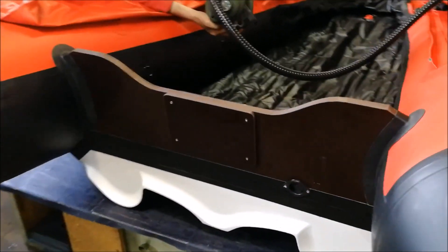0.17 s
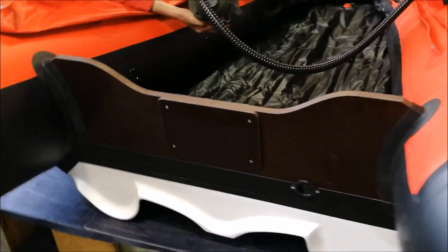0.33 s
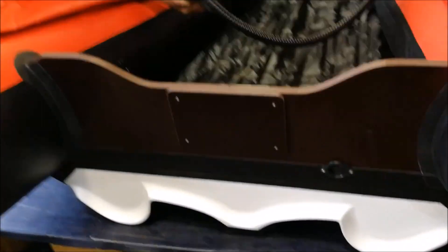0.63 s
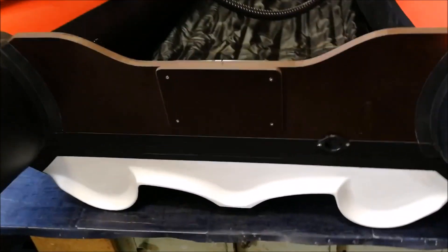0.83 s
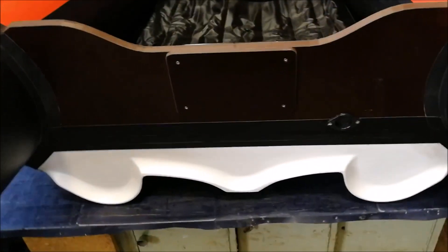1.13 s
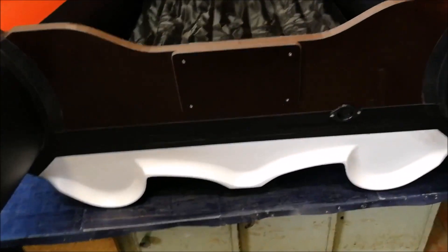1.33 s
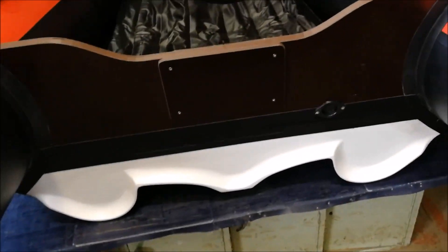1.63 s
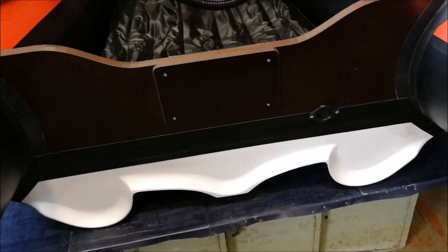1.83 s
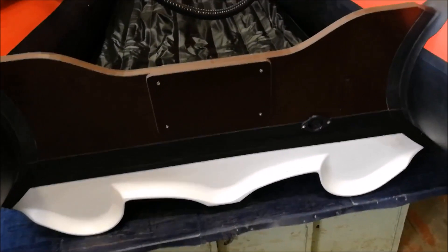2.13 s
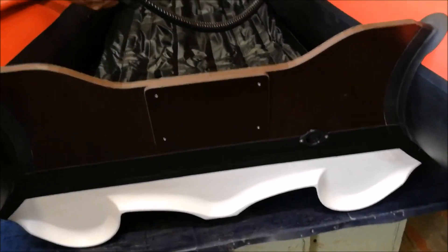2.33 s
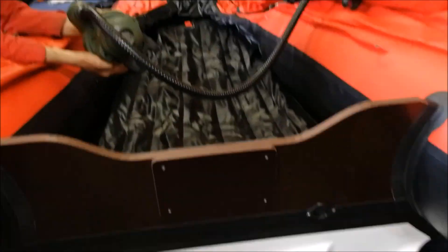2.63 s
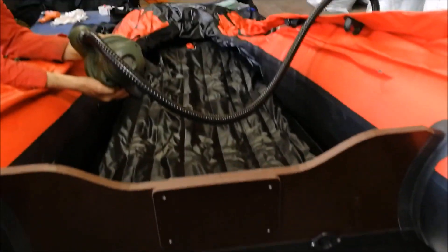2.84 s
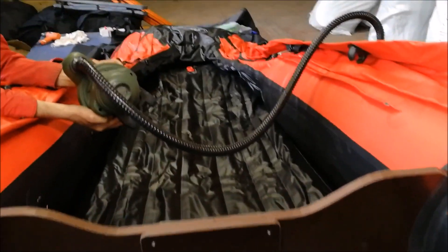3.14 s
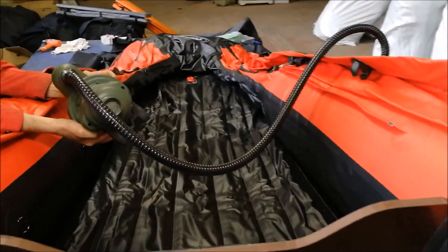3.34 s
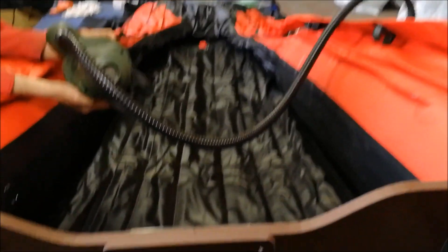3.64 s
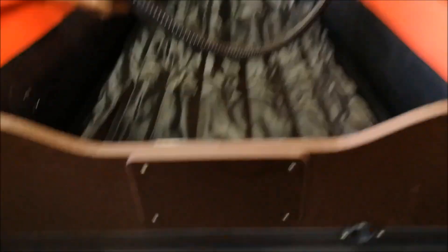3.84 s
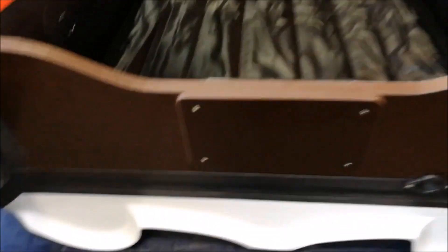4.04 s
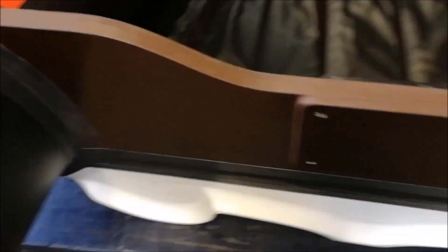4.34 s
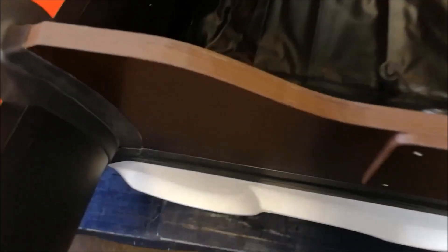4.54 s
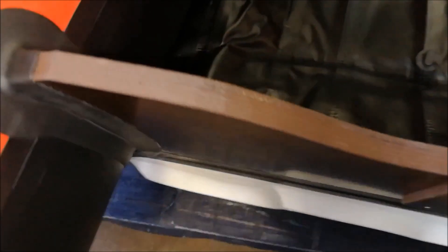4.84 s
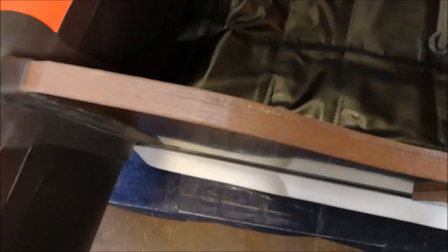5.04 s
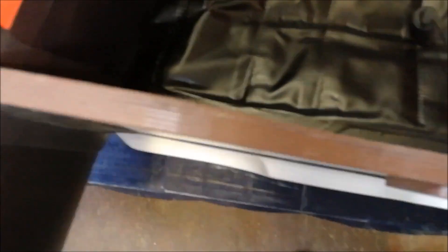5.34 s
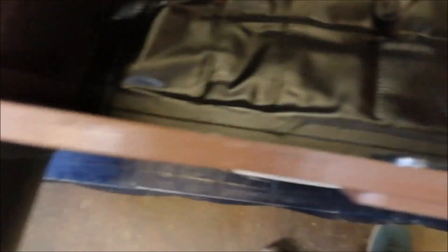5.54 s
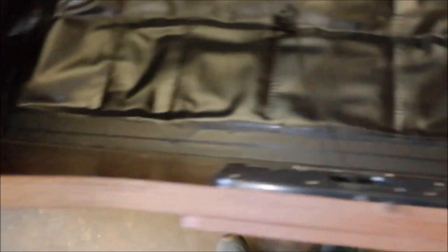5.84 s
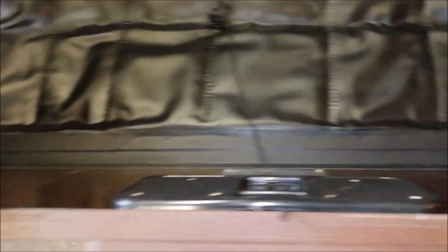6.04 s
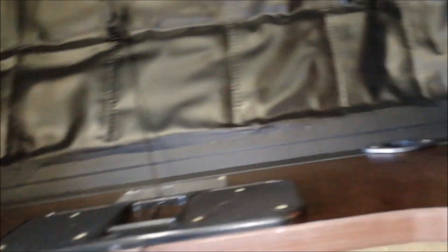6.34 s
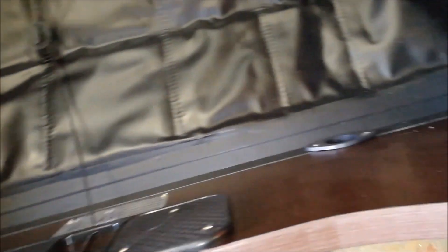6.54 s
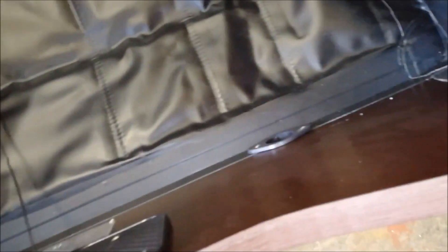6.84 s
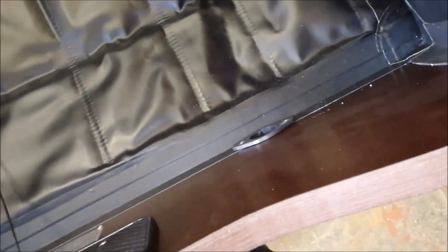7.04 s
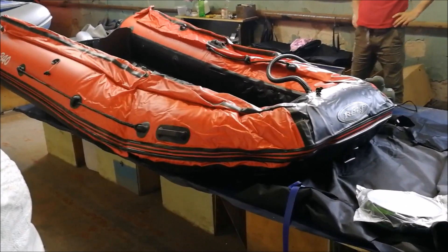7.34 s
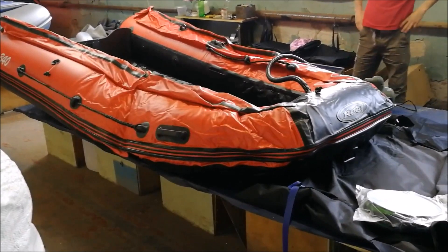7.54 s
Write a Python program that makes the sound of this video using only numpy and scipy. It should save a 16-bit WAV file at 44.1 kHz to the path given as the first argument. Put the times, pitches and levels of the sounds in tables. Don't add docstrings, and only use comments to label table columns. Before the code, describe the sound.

An electric air pump roars and whines close up with buffeting thumps, switches off and winds down, then restarts and runs steadily farther away.

```python
import sys
import numpy as np
from scipy import signal
from scipy.io import wavfile
from scipy.ndimage import uniform_filter1d, map_coordinates

SR = 44100
rng = np.random.default_rng(int(sys.argv[2]) if len(sys.argv) > 2 else 0)


def volts_from_db(level):
    exponent = np.asarray(level, float) / 20
    return 10 ** exponent


def log_audio(samples):
    frames = np.atleast_2d(samples).T
    limited = np.clip(frames, -1, 1)
    pcm = np.round(limited * 32767).astype(np.int16)
    wavfile.write(sys.argv[1], SR, pcm)


N = 338688
T = np.arange(N) / SR
FRAME, HOP = 1024, 256
OFF_S, BREAK_S, RESUME_S = 3.821, 7.128, 7.161


def unit(x):
    return x / np.sqrt(np.mean(x ** 2))


def curves(table, t):
    s, *columns = np.transpose(table)
    return [np.interp(t, s, c) for c in columns]


def colour(table, hz):
    table_hz, value = np.array(table)[:, :2].T
    return np.interp(np.log(np.maximum(hz, 1)), np.log(table_hz), value)


def bump(x, middle, half):
    return np.exp(-np.square(np.square((x - middle) / half)))


def walk(rate_hz):
    knots = rng.standard_normal(200)
    return map_coordinates(knots, [T[::64] * rate_hz], order=3).repeat(64)[:N]


def shaped(db, likeness):
    a, b = (signal.stft(rng.standard_normal(N), nperseg=FRAME, noverlap=FRAME - HOP)[2] for _ in range(2))
    c = np.clip(likeness, -.99, .99)[:, None]
    pair = np.array([a, c * a + np.sqrt(1 - c ** 2) * b]) * volts_from_db(db)
    return signal.istft(pair, nperseg=FRAME, noverlap=FRAME - HOP)[1][:, :N]


# (time [s], speed [turns/s])
LOADED = [(0, 585.6), (1, 587.3), (1.9, 588), (2.4, 588.6), (3.36, 590.1), (3.821, 590.5)]


def shaft(t):
    rest_hz, scale_hz, drag_rate, resumed_hz = 9.84, 192.3, .2331, 560.3
    angle = np.arctan((LOADED[-1][1] - rest_hz) / scale_hz)
    coast = rest_hz + scale_hz * np.tan(angle - drag_rate * np.clip(t - OFF_S, 0, None))
    return np.where(t < OFF_S, curves(LOADED, t)[0], np.where(t < BREAK_S, coast, resumed_hz))


def speed_db(t):
    return 20 * np.log10(shaft(t) / LOADED[-1][1])


# (frequency [Hz], level [dB])
LEFT = [(40, -24), (250, -2), (520, -10.5), (750, 3.5), (1800, 1.5), (3000, 5), (3800, 1), (4500, 1),
        (6800, -1), (7500, 1.5), (8600, 8.5), (9900, 3), (11500, -5.5), (15500, -13)]
RIGHT = [(40, -20), (250, -3), (550, -9.5), (1150, 2), (1500, 2), (2200, 3), (2700, 0.5), (4900, -2.5),
         (6200, -6), (7300, -8.5), (9300, -4.5), (11000, -1.5), (12500, 2), (15500, -7)]
# (frequency [Hz], full-speed level [dB], slope [dB per dB of speed], turning the phone [dB per turn])
ROAR_LAW = [(1340, -35.5, 0.9, 2), (4540, -25.5, 1.43, 1.9), (8650, -21, 1.94, 0.8), (12440, -32, 1.86, 13)]
# (time [s], nearness [dB], turned to outlet [0-1], left minus right [dB])
STANCE = [(0, -2, 0, -2.7), (.6, -0.5, 0, -2.2), (1.3, -1.1, 0.39, -0.2), (2.4, -0.65, 0.09, .1),
          (3.3, -0.8, 0.25, 0.7), (3.75, -0.1, 0.08, -1), (3.86, 1, 0.14, -1), (3.93, -0.1, 0.05, -0.2),
          (4.23, 2.5, 0.74, 2.1), (4.45, 1.4, 0.93, -4.3), (5.0, 1.2, 0.88, -2.3), (5.55, 3.2, 0.3, -2.5),
          (5.95, 3.5, 0, -1.3), (6.5, 1.2, 0.3, 1), (7.12, 2, 0.3, 2.3), (7.16, -5, 0, 2.5),
          (7.68, -5, 0, 2.5)]


def roar_db(t, hz):
    near_db, turn, pan_db = curves(STANCE, t)
    full_db, steep, turn_db = (colour([(row[0], row[k]) for row in ROAR_LAW], hz) for k in (1, 2, 3))
    restart_s = 7.03
    back = 0.76 * np.clip((t - restart_s) / (BREAK_S - restart_s), 0, 1) ** 0.84
    hard_s = [s for s, peak_db, *_ in PUFFS if peak_db > -19]
    duck = sum((t > s) * np.exp(-np.abs(t - s) / 0.15) for s in hard_s)
    duck_db = -2 * np.minimum(duck, 1)
    mid_db = full_db + steep * speed_db(t) * (1 - back) + near_db + turn * turn_db + duck_db
    return np.array([mid_db + colour(LEFT, hz) + pan_db / 2, mid_db + colour(RIGHT, hz) - pan_db / 2])


# (frequency [Hz], correlation [-1 to 1])
LIKENESS = [(40, 0.42), (200, 1), (400, 0.21), (550, -0.28), (800, 0.37), (1200, 0.56), (2200, -0.091),
            (16000, -0.058)]
# (middle [s], half length [s], frequency [Hz], half
# width [Hz], level [dB])
GLINTS = [(4.7, 0.2, 11300, 550, 6.5), (5.17, 0.23, 2200, 150, 9), (5.66, 0.78, 1520, 220, 6.5),
          (3.32, 0.45, 5500, 2100, 2.5), (3.2, 0.23, 1600, 89, 4.5), (5.22, 0.38, 9460, 460, 5.5),
          (4.65, .55, 14700, 980, -7), (0.62, 0.66, 1920, 220, 3.5), (6.6, 2.9, 460, 850, 3),
          (7.115, .02, 3850, 150, 11), (7.115, 0.022, 2200, 81, 9), (7.23, 0.51, 1020, 320, -4),
          (6.4, 0.3, 10800, 600, 1)]
LEFT_GLINTS = [
    (4.73, 0.29, 8870, 470, 4.6),
    (4.74, 0.33, 2730, 600, 6.5),
]


def roar(patch_db=2.0, flicker_db=0.95, gain_db=9.5):
    hz = np.fft.rfftfreq(FRAME, 1 / SR)
    t = np.arange(-(-N // HOP) + 1) * HOP / SR

    def glint_db(rows):
        return sum(db * np.outer(bump(hz, f, half_hz), bump(t, s, half_s)) for s, half_s, f, half_hz, db in rows)

    def smooth(x, bins, frames):
        return unit(uniform_filter1d(uniform_filter1d(x, size=bins, axis=1), size=frames, axis=2))

    chance = rng.standard_normal((2, len(hz), len(t)))
    patches = smooth(chance, 8, 60)
    flicker = smooth(chance[::-1, ::-1], 90, 8)
    db = roar_db(t[None], hz[:, None]) + patch_db * patches + flicker_db * flicker
    db = db + glint_db(GLINTS) + gain_db
    db[0] += glint_db(LEFT_GLINTS)
    return shaped(db, colour(LIKENESS, hz))


def tone(turns, hz, db):
    gain = volts_from_db(np.array([colour(LEFT, hz[::64]), colour(RIGHT, hz[::64])]))
    share = (gain / np.hypot(*gain)).repeat(64, axis=1)[:, :N]
    fade_db = 2.8 * np.array([walk(18), walk(18)])
    phase = turns + uniform_filter1d(.12 * np.array([walk(7), walk(7)]), size=64)
    return volts_from_db(db + fade_db + 5) * share * np.sin(2 * np.pi * phase)


ORDERS = (1, 2, 7, 8, 14, 16, 17, 21, 28, 35, 42, 49, 63)
# (loaded [dB], coasting at full speed [dB], further away [dB])
STEADY = [(-67, -52, -55.5), (-50, -60, -67), (-42.5, -52, -41), (-46.5, -66, -63), (-30.5, -47, -34),
          (-32, -54, -51), (-62, -72, -70), (-53, -36, -60), (-60, -51, -66), (-60, -50, -66),
          (-64, -51, -70), (-64, -50, -70), (-70, -56, -74)]
# (middle [s], half length [s], level [dB])
STREAKS = [
    [(4.48, 0.06, -42.5), (4.8, 0.064, -46.5), (5.15, .25, -51), (6.15, 0.19, -56.5)],
    [(2.3, .5, -57)],
    [(1.35, .45, -37), (3.55, 0.59, -35.5), (6.0, 0.18, -51), (6.38, 0.14, -49)],
    [(2.406, 1.7, -42)],
    [(1.55, 0.69, -29), (2.72, .18, -28), (3.42, 0.058, -30), (4.02, 0.065, -26.5), (4.25, 0.12, -33.5),
     (4.75, .1, -37.5), (5.15, 0.11, -32)],
    [(1.45, 0.42, -34), (2.45, 0.44, -33)],
    [(1.9, .9, -37)],
    [(3.9, .07, -42), (4.17, 0.063, -28), (4.38, 0.075, -22.5), (4.56, 0.07, -35)],
    [(4.15, 0.33, -50), (4.55, 0.11, -38), (5.7, 0.2, -62)],
    [(4.5, 0.098, -43), (4.8, 0.084, -31), (5.05, .08, -46)],
    [(5.05, 0.063, -45), (5.8, .15, -54)],
    [(4.98, .15, -49), (5.5, .17, -47), (5.92, 0.11, -38)],
    [(5.6, .12, -54), (6.08, .08, -55)],
]


def impeller():
    coast_slope = 1.36
    hz, t = shaft(T), T[::64]
    turns = np.cumsum(hz + .1 * walk(15)) / SR
    out = 0
    for k, (load_db, coast_db, far_db), rows in zip(ORDERS, STEADY, STREAKS):
        loaded_db = load_db + curves(STANCE, t)[0]
        coasting_db = coast_db + coast_slope * speed_db(t)
        db = np.where(t < OFF_S, loaded_db, np.where(t < BREAK_S, coasting_db, far_db))
        swell = volts_from_db(db) + sum(volts_from_db(top_db) * bump(t, s, half_s) for s, half_s, top_db in rows)
        audible = k * shaft(t) < 16000
        out = out + np.interp(T, t, swell * audible) * tone(k * turns, k * hz, 0)
    return out


# (start [s], end [s], frequency [Hz], level [dB])
WHIRL = [
    (0, 2.75, 189, -45.5),
    (2.75, 3.85, 188, -53),
    (1.1, 1.95, 248, -50),
    (3.05, 3.5, 246, -49),
    (6.95, 7.13, 265, -48),
    (7.16, 7.7, 377, -55),
    (7.16, 7.7, 247, -55),
]


def whirl():
    out = 0
    for start_s, end_s, hz, db in WHIRL:
        on = np.clip(np.minimum(T - start_s + 0.091, end_s - T) / 0.093, 0, 1)
        level = volts_from_db(db + 3 + 2.2 * walk(10))
        out = out + on * level * np.sin(2 * np.pi * np.cumsum(hz + 1.5 * walk(14)) / SR)
    return out


# (time [s], frequency [Hz], level [dB])
HOSE = [
    (5.18, 5270, -60),
    (5.28, 5141, -37.5),
    (5.56, 4740, -39.5),
    (5.9, 4300, -51),
    (6.26, 3860, -50),
    (6.4, 3705, -40.5),
    (6.52, 3580, -54),
    (6.7, 3390, -49),
    (7.05, 3070, -51),
]
# (time [s], frequency [Hz], level [dB])
VALVE = [
    (6.24, 214, -60),
    (6.28, 214, -46),
    (6.34, 204, -44),
    (6.46, 202, -44),
    (6.51, 216, -54),
    (6.56, 219, -44),
    (6.75, 221, -47),
    (6.95, 224, -58),
]


def hose_and_valve():
    out = 0
    for table in (HOSE, VALVE):
        hz, db = curves(table, T)
        on = (T > table[0][0]) & (T < table[-1][0])
        turns = np.cumsum(hz) / SR
        out = out + on * (tone(turns, hz, db) + tone(2 * turns, 2 * hz, db - 20))
    return out


# (start [s], mains hum [Hz], level [dB])
SURGE = (7.045, 100, -35)


def surge():
    start_s, hz, db = SURGE
    on = np.clip((T - start_s - .01) / 0.031, 0, 1) * (T < BREAK_S)
    return on * volts_from_db(db) * np.sin(2 * np.pi * hz * T)


# (frequency [Hz], density [dB per Hz])
BUFFET_COLOUR = [(12, -41), (20, 1), (97, -0.5), (170, 2), (216, -2), (300, -3), (462, -11), (700, -16)]
# (middle [s], half length [s], level [dB])
GUSTS = [(0.115, 0.034, -32.5), (0.313, 0.058, -32), (.4, 0.058, -34), (0.517, 0.098, -31.5),
         (0.657, 0.037, -32), (0.933, 0.3, -36), (1.486, 0.029, -43), (1.802, .03, -52),
         (2.537, 0.055, -47.5), (3.248, 0.091, -49), (3.532, .07, -38.5), (3.807, 0.17, -35.5),
         (4.017, 0.047, -25.5), (4.113, 0.052, -36), (4.186, 0.021, -25), (4.437, 0.023, -46),
         (6.6, .36, -56), (7.017, 0.066, -49)]


def rumble(calm_db=-54.5, calm_wander_db=0.5, lump_db=3.5, gain_db=18, alike=0.89):
    hz = np.fft.rfftfreq(FRAME, 1 / SR)
    steep_db = np.where(hz > 700, -120, 0)
    db = (colour(BUFFET_COLOUR, hz) + steep_db)[:, None] * np.ones((2, 1, 1))
    calm = volts_from_db(calm_db + calm_wander_db * walk(6))
    gusts = calm + sum(volts_from_db(top_db) * bump(T, s, half_s) for s, half_s, top_db in GUSTS)
    level = gusts * volts_from_db(lump_db * walk(30)) * (T < BREAK_S)
    return shaped(db, np.clip(alike - hz / 900, .3, 1)) * level * volts_from_db(gain_db)


# (time [s], peak [dB], frequency [Hz], length [s], snap [ratio])
PUFFS = [(0.105, -34, 121, 0.0078, 3.1), (0.278, -19, 113, 0.0067, 5.8), (0.288, -36, 159, 0.006, 3.4),
         (0.313, -24, 164, 0.011, 3.6), (0.397, -28.5, 169, 0.0043, 4.3), (0.459, -19.5, 95, 0.0069, 4.9),
         (0.477, -21.5, 287, 0.0058, 5.9), (0.514, -22.5, 170, 0.0075, 6.3), (0.543, -29, 163, 0.014, 3.9),
         (0.606, -21, 200, 0.0043, 3.2), (0.635, -23.5, 180, 0.007, 5.4), (0.665, -20.5, 140, 0.0076, 3.2),
         (0.849, -21.5, 153, 0.0064, 1.7), (0.928, -22, 181, 0.0043, 1.4), (1.452, -38, 91.5, 0.007, 3.5),
         (3.456, -37, 108, 0.01, 3), (3.678, -27.5, 99, 0.013, 3.6), (4.025, -10, 94.5, 0.0063, 1.6),
         (4.0387, -18, 148, 0.0035, 7.6), (4.172, -17, 111, 0.0056, 4.4), (4.187, -42, 96, 0.0088, 4.7)]


def puffs():
    out = np.zeros((2, N))
    t = np.arange(4096) / SR
    for s, peak_db, hz, length_s, snap in PUFFS:
        phase, left, right = rng.standard_normal((3, len(t)))
        shape = t / length_s * np.exp(1 - t / length_s)
        wander = 0.09 * np.cumsum(uniform_filter1d(phase, size=40))
        swing = np.sin(2 * np.pi * hz * t + wander)
        edge_hz = 575 * 0.0064 / length_s
        edge = signal.lfilter(*signal.butter(2, edge_hz, fs=SR), [left, 0.57 * left + 0.44 * right])
        i = int(s * SR)
        out[:, i:i + len(t)] += volts_from_db(peak_db) * shape * (swing + 1.36 * snap * shape ** 3 * edge)
    return out


# (before turn [samples], after turn [samples], turn [s])
PORT_LAG = (48, -28, 3.0)


def buffet():
    left, right = rumble() + puffs()
    early, late, turn_s = PORT_LAG
    return np.array([left, np.where(T < turn_s, np.roll(right, early), np.roll(right, late))])


def scene():
    return roar() + impeller() + whirl() + hose_and_valve() + surge() + buffet()


def roll_off(x):
    return signal.sosfilt(signal.butter(12, 15820, fs=SR, output="sos"), x)


def record(dry):
    dry = signal.sosfilt(signal.butter(2, 36, "high", fs=SR, output="sos"), dry)
    tail = volts_from_db(-14 - 1600 * np.clip(T - BREAK_S, 0, 1))
    gate = np.where((T > BREAK_S) & (T < RESUME_S), tail, 1)
    return roll_off(np.clip(dry * gate, -1, 1))


dry = scene()
out = record(dry)
log_audio(out)
```